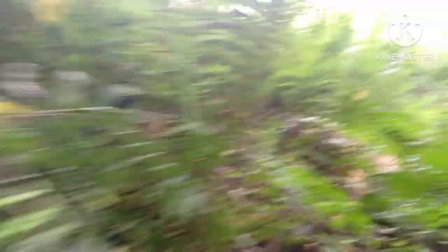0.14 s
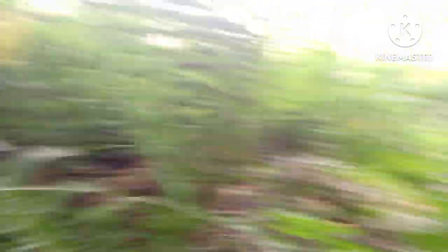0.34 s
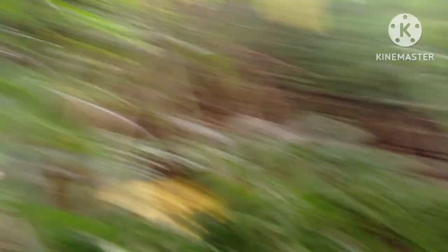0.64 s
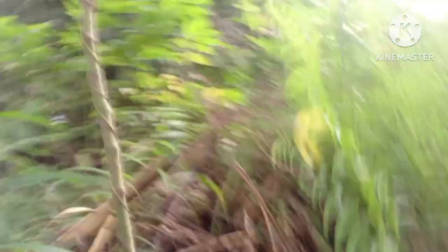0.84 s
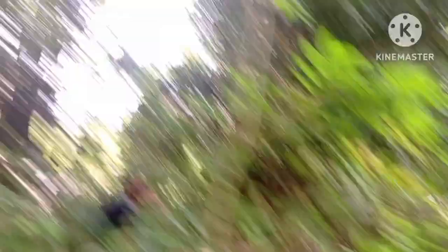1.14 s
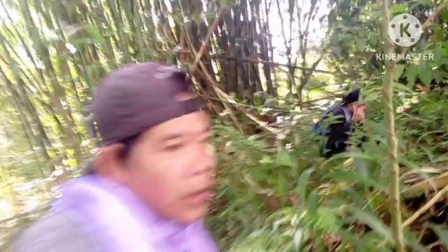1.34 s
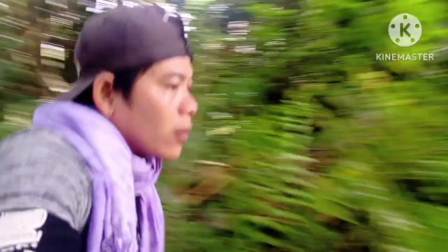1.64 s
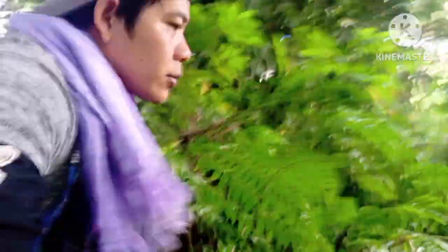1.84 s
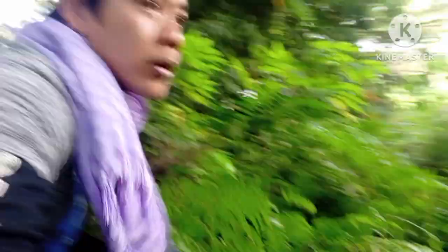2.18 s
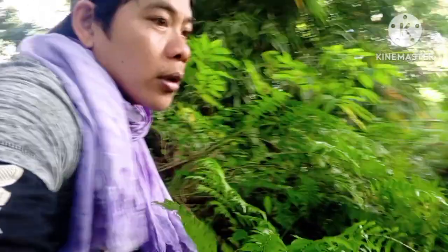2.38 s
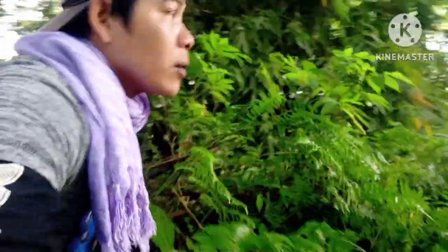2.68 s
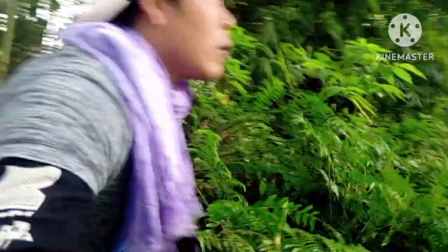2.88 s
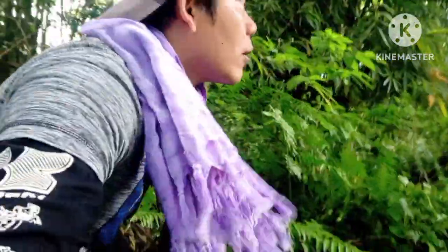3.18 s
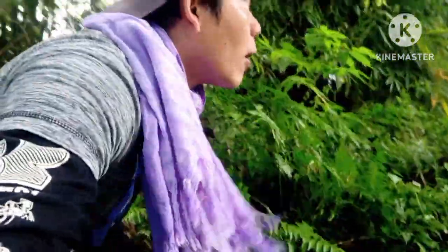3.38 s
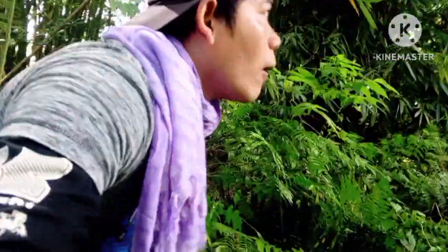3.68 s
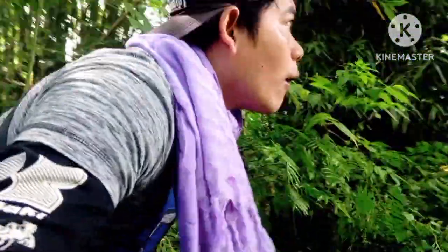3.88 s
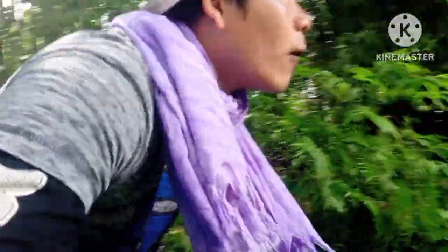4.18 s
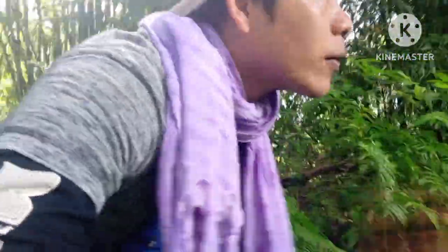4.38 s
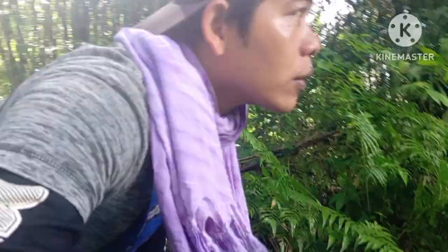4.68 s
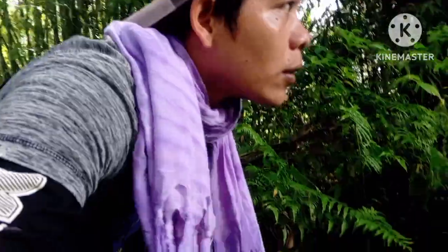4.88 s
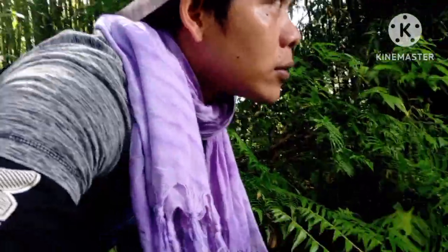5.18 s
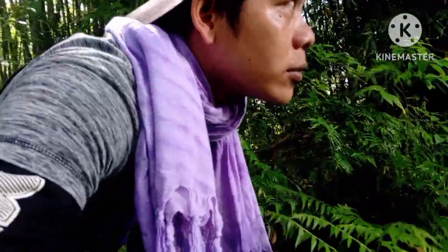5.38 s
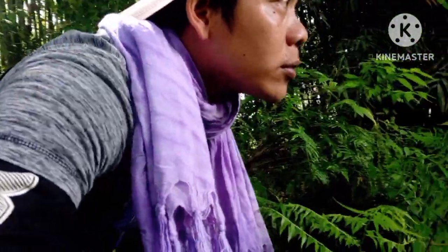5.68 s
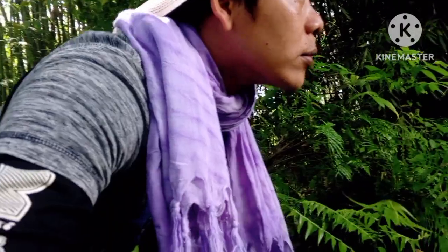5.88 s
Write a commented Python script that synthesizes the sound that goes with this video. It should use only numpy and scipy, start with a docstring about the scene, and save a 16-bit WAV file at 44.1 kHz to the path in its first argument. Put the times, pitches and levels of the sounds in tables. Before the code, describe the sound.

Someone pushes through forest undergrowth close to a handheld microphone. Leaves swish and crunch, and twigs snap sharply in the first two seconds, mixed with low thuds, air puffs and small scrapes of a grip on the holder. The movement eases into lighter rustles and ticks, with one more sharp snap. As the person stands still, faint, distant insects trill over a quiet hiss.

```python
"""Forest undergrowth: someone pushes through with a phone on a stick, then stands still.
Sliding leaves rustle and crunch; twigs snap, ring and splinter. The grip rubs the hollow holder,
knocks travel up the stick, steps thud through it, air puffs on the microphone. Far off, over a quiet
hiss, two kinds of insect sing with wing strokes, dipping under the phone's noise suppression."""
import sys
import numpy as np
from scipy import signal
from scipy.fft import rfft, irfft, next_fast_len
from scipy.io import wavfile
from scipy.ndimage import uniform_filter1d, map_coordinates

SR = 44100
rng = np.random.default_rng(int(sys.argv[2]) if len(sys.argv) > 2 else 0)


def put_to_file(sound):
    """Save the sound as 16-bit audio at rate SR, in the file named by the first command-line argument."""
    columns = np.atleast_2d(sound).T  # one column per channel
    safe = np.clip(columns, -1, 1)
    whole_steps = np.round(safe * 32767)
    wavfile.write(sys.argv[1], SR, whole_steps.astype(np.int16))


N = 265875
T = np.arange(N) / SR

# leaf rustle through the phone microphone, with its treble dip: (frequency [Hz], density [dB])
RUSTLE_AT_MIC = [(2300, -9), (4000, -2.5), (4400, 1.5), (6100, 0.5), (8000, -9.5), (9500, -5.5),
                 (11600, -22), (13700, -17), (15900, -17)]


def foliage():
    """Leaves slide on body and feet: a fine rustle with dry ticks; pressure adds a deeper crunch."""
    # foliage sliding past: (start [s], length [s], rustle [dB], crunch re rustle [dB])
    swishes = [(0, 0.23, -76, 2.5), (0.214, 0.18, -79, 11), (0.58, 0.29, -66.5, -1.5),
               (0.945, 0.17, -60.5, -3), (1.084, 0.11, -67, -6), (1.21, 0.19, -70.5, -29),
               (1.353, 0.68, -63, -8.5), (1.851, .22, -64.5, -3.5), (2.066, 0.25, -58.5, -16),
               (2.279, 0.06, -52.5, -2.5), (2.519, 0.25, -65, -5.5), (2.711, 0.015, -49.5, -5.5),
               (2.724, 0.13, -73.5, 1.5), (3.212, 0.23, -66, -6), (3.481, 0.27, -68.5, -16),
               (3.761, 0.14, -66.5, -5.5), (3.951, 0.16, -68.5, -6), (4.249, 0.19, -64, -7),
               (4.406, 0.11, -67, 3.5), (4.654, 0.078, -68.5, 4.5), (4.778, .26, -70, -12.5)]
    # weight on dry leaves: (start [s], rustle [dB], length [s])
    presses = [(0.14, -50.5, 0.089), (0.372, -61.5, 0.072), (0.879, -47.5, 0.095), (1.742, -53, 0.11),
               (2.496, -61, 0.12), (2.863, -64, 0.16), (2.957, -59.5, 0.081), (3.084, -68.5, 0.088),
               (3.409, -56.5, 0.0237), (3.668, -65, 0.057), (3.885, -60, 0.021), (4.992, -67, 0.03)]
    # crushed-leaf spectrum: (frequency [Hz], density [dB])
    crunch_spectrum = [(300, -19.5), (1000, 4.5), (2000, 8), (3800, -3.5), (5500, -22.5)]
    press_crunch_db = 4
    t = T[::SR // 1000]  # envelopes in 1 ms steps
    moves = [(amp(db) * slide(t - start, length_s), crunch_db)
             for start, length_s, db, crunch_db in swishes]
    moves += [(amp(db) * swell(t - start, length_s, rise=0.073), press_crunch_db)
              for start, db, length_s in presses]
    rustle_env = np.interp(T, t, np.sqrt(sum(env ** 2 for env, _ in moves)))
    crunch_env = np.interp(T, t, np.sqrt(sum((amp(db) * env) ** 2 for env, db in moves)))
    grit = unit(crackle(rate_hz=720, spread_db=7, t60_s=0.012, hiss=0.56))
    ticks = unit(crackle(rate_hz=70, spread_db=4, t60_s=0.0068, hiss=0))
    friction = grit + amp(-14) * ticks
    rustle = unit(filtered(patchy(friction, depth_db=3.5, bins=3, frames=16), colour(RUSTLE_AT_MIC)))
    crunch = unit(filtered(patchy(friction, depth_db=4.5, bins=2, frames=20), colour(crunch_spectrum)))
    return amp(1.5 * wobble(30)) * (rustle_env * rustle + crunch_env * crunch)


def snaps():
    """A break rings for a few cycles at its own pitch; bright splinters spatter after it."""
    # twigs and stiff leaves: (time [s], ring peak [dB], pitch [Hz], splinters re ring [dB])
    breaks = [(0.151, -38, 1800, -16.5), (0.1793, -18.5, 1830, -11.5), (0.354, -46.5, 1940, -13),
              (0.8812, -28, 3830, -10), (0.9018, -15, 1570, -5.5), (0.9171, -18.5, 2360, 0),
              (0.9389, -14.5, 1900, -11.5), (0.958, -28.5, 1360, -21.5), (1.781, -30, 4330, -10),
              (1.785, -22, 2780, -5.5), (1.794, -29, 4500, -6), (2.288, -41.5, 4640, -0.5),
              (2.712, -49.5, 2560, -13.5), (2.7246, -45, 4800, -4.5), (2.872, -49, 2000, -14),
              (2.961, -50, 1930, -3), (3.4118, -33, 2070, -23), (3.692, -40.5, 1560, -13),
              (3.784, -44.5, 3800, -12), (3.889, -39.5, 2400, -11.5), (3.9843, -52, 4400, -10),
              (4.052, -47.5, 3320, -21.5), (4.0923, -16.5, 2664, -18), (4.8618, -45, 3090, -12),
              (5.0021, -45, 2720, -15)]
    body_t60_s, spatter_t60_s = 0.056, 0.011
    out, t = np.zeros(N + SR), T[:SR // 8]
    for start, db, hz, splinter_db in breaks:
        body_noise, splinter_noise = rng.standard_normal((2, len(t)))
        rise_cycles = np.clip(0.4 - splinter_db / 18, 0.4, 2)  # a clean break rings longer
        age = t * hz / rise_cycles
        phase = 2 * np.pi * hz * t
        ring = (np.sin(phase) + 0.15 * np.sin(2 * phase)) * age * np.exp((1 - age ** 2) / 2)
        decay = amp(-60 * t / body_t60_s)
        body = 0.035 * unit(filtered(body_noise, modes([(hz, 0.5 * hz, 0)]))) * decay
        spatter = unit(filtered(splinter_noise,
                                lambda f: amp(splinter_db - 14.5) + colour(RUSTLE_AT_MIC)(f)))
        spatter_env = amp(-60 * t / spatter_t60_s) * (1 - np.exp(-t * hz)) + 0.22 * decay
        splinters = amp(splinter_db) * spatter * spatter_env
        out[round(start * SR):][:len(t)] += amp(db) * (ring + body + splinters)
    return filtered(out[:N], low_cut(1200))  # thin twigs radiate no bass


def knocks():
    """Dull knocks reach the microphone through the stick and die fast."""
    # knocks on the holder: (time [s], level [dB], pitch [Hz])
    hits = [(2.501, -34, 278), (3.89, -48.5, 228), (4.091, -40.5, 234)]
    t60_s = 0.05
    out, t = np.zeros(N), T[:SR // 8]
    for start, db, hz in hits:
        env = amp(db - 60 * t / t60_s) * (1 - np.exp(-t * hz))
        out[round(start * SR):][:len(t)] += env * np.sin(2 * np.pi * hz * t)
    return out


def grip_rubs():
    """The grip slips in short rough strokes: a pitched scrape over the hollow holder's low mode."""
    # strokes: (start [s], scrape [dB], pitch [Hz], low mode re scrape [dB], length [s])
    strokes = [(0.12, -52.5, 802, -31, 0.092), (0.154, -50.5, 775, -1, 0.082),
               (0.18, -34, 694, -10, 0.0054), (0.266, -59, 802, -13, 0.15), (0.386, -46.5, 712, -19, 0.046),
               (0.41, -40.5, 643.6, -9, 0.022), (0.635, -71.5, 482, 2, 0.23),
               (0.742, -61.5, 776, -36, 0.24), (0.907, -44.5, 664, -1.5, 0.065),
               (1.294, -60, 624, -8, 0.012), (1.443, -68, 1276, -30, 0.18), (1.726, -56, 879, -7, 0.16),
               (1.772, -57, 681, -1.5, 0.11), (2.494, -56.5, 587, 8, 0.068),
               (2.556, -61.5, 692, -6.5, 0.14), (2.704, -62.5, 693, -39, 0.17),
               (2.867, -61.5, 777, -10.5, 0.22), (2.954, -63.5, 742, 7, 0.058),
               (3.092, -60.5, 610, -43, 0.043), (3.268, -79, 682, 12, 0.067),
               (3.411, -57.5, 671, -37, 0.015), (3.688, -57.5, 779, -8.5, 0.047),
               (3.891, -57, 721, -22.5, 0.033), (4.45, -64.5, 791, 0, 0.091), (4.485, -57, 816, -1, 0.023),
               (4.666, -63, 730, 5.5, 0.066)]
    mode_hz, mode_width_hz = 360, 170
    out = np.zeros(N)
    slips = crackle(rate_hz=90, spread_db=5, t60_s=0.03, hiss=0.45)
    body = unit(filtered(slips, lambda f: modes([(mode_hz, mode_width_hz, 0)])(f) ** 2))
    rasp = 0.25 + wobble(230) + 1j * wobble(230)  # steady tone plus narrow noise
    for start, db, hz, mode_db, length_s in strokes:
        at = slice(round(start * SR), round((start + 3 * length_s) * SR))
        scrape = np.real(rasp[at] * np.exp(2j * np.pi * hz * T[at]))
        env = amp(db) * swell(T[at] - start, length_s, rise=0.03)
        out[at] += env * (scrape + amp(mode_db) * body[at])
    return filtered(out, low_cut(150))  # too small to radiate bass


def puffs_and_thuds():
    """Air puffs on the microphone, step thuds on the holder: a swell of uneven low cycles and flutter."""
    # air puffs and, at the higher pitches, step thuds: (start [s], peak [dB], pitch [Hz])
    bumps = [(0.002, -68, 70), (0.068, -64, 65.4), (0.16, -53, 222.4), (0.205, -58, 178), (0.335, -62, 164),
             (0.718, -64.5, 93), (0.956, -47, 91.7), (0.657, -48, 63), (0.907, -47, 153), (1.156, -46, 101),
             (1.198, -32.5, 124), (1.244, -34, 83.5), (1.293, -44, 88), (1.52, -53, 83.5),
             (1.624, -49.5, 66.5), (1.667, -59.5, 70), (1.83, -62, 166), (2.997, -58, 48.7),
             (4.911, -53.5, 73), (5.374, -50.5, 76.5)]
    length_s = 0.057
    out = np.zeros(N)
    jitter_rad = 1.5 * wobble(70)
    flutter = 0.14 * unit(wobble(420))
    for start, db, hz in bumps:
        progress = (T - start) / length_s
        at = (progress > 0) & (progress < 1)
        cycles = np.sin(2 * np.pi * hz * (T[at] - start) + jitter_rad[at])
        env = amp(db) * np.sin(np.pi * progress[at] ** 0.8) ** 2
        out[at] += env * (cycles + flutter[at])
    return out


def wing_song(hz, half_width_hz, stroke_hz, depth, jitter_rad):
    """Narrow noise chopped by slightly uneven wing strokes."""
    band = noise_band(hz, half_width_hz)
    strokes = 1 + depth * np.cos(2 * np.pi * stroke_hz * T + jitter_rad * wobble(25))
    return unit(band * strokes)


def insects():
    """A fast trill in bouts and a higher uneven chirp, over a blurred crowd of others."""
    # trill bouts: (start [s], level [dB], pitch [Hz], length [s])
    bouts = [(5.056, -73, 4680, 0.12), (5.509, -65.5, 4650, 0.089), (5.606, -67, 4650, 0.059),
             (5.694, -61, 4750, 0.089), (5.383, -72, 4870, 0.6), (5.855, -61.5, 4700, 0.095)]
    # chorus level at the phone, dipping where its noise suppression closes: (time [s], level [dB])
    chorus_levels = [(.6, -100), (.9, -77), (1.1, -68.5), (2.3, -88.5), (4.6, -94.5), (4.9, -75.5),
                     (6, -72.5)]
    trill = np.zeros(N)
    for start, db, hz, length_s in bouts:
        song = wing_song(hz, half_width_hz=330, stroke_hz=62, depth=0.45, jitter_rad=1.5)
        trill += amp(db) * swell(T - start, length_s, rise=0.3) * song
    chirp = wing_song(hz=6220, half_width_hz=170, stroke_hz=39, depth=0.65, jitter_rad=0.7)
    chirp *= amp(2.5 * wobble(18))
    crowd = unit(patchy(noise_band(hz=5900, half_width_hz=1500), depth_db=4, bins=3, frames=30))
    chorus_db = np.interp(T, *np.transpose(chorus_levels))
    return trill + amp(chorus_db) * (chirp + amp(-4) * crowd)


def air():
    """Quiet hiss of forest and microphone."""
    # noise floor: (frequency [Hz], density [dB])
    spectrum = [(20, -4), (60, -6), (150, -8), (1000, -16), (3300, -15), (7000, -15), (9400, -14.5),
                (12000, -26.5), (16000, -33)]
    level_db = -76 + 0.6 * wobble(15)
    hiss = patchy(rng.standard_normal(N), depth_db=3.5, bins=4, frames=14)
    return amp(level_db) * unit(filtered(hiss, colour(spectrum)))


def amp(db):
    """Decibels to gain."""
    return 10 ** (np.asarray(db) / 20)


def unit(x):
    """x at rms 1."""
    return x / np.sqrt(np.mean(x ** 2) + 1e-20)


def wobble(rate_hz):
    """Smooth random curve, rate_hz knots a second."""
    return map_coordinates(rng.standard_normal(int(N * rate_hz / SR) + 4), [T * rate_hz])


def filtered(x, response):
    """x through a complex frequency response."""
    size = next_fast_len(len(x) + SR // 4)
    return irfft(rfft(x, size) * response(np.fft.rfftfreq(size, 1 / SR)), size)[:len(x)]


def colour(points):
    """Response through (frequency [Hz], gain [dB]) points on a log axis."""
    hz, db = np.transpose(points)
    return lambda f: amp(np.interp(np.log(f + 1), np.log(hz + 1), db, left=-120, right=-120))


def modes(table):
    """Causal response of (centre [Hz], width [Hz], gain [dB]) resonances."""
    return lambda f: sum((-1) ** k * amp(db) * 1j * f * width / (hz * hz - f * f + 1j * f * width)
                         for k, (hz, width, db) in enumerate(table))


def low_cut(hz):
    """Second-order high-pass response."""
    return lambda f: (1j * f / (hz + 1j * f)) ** 2


def noise_band(hz, half_width_hz):
    """Flat-topped band of noise."""
    return filtered(rng.standard_normal(N), lambda f: np.exp(-((f - hz) / half_width_hz) ** 4))


def crackle(rate_hz, spread_db, t60_s, hiss):
    """Short noise bursts of uneven size; hiss is the steady share."""
    onsets = rng.random(N) < rate_hz / SR
    sizes = amp(spread_db * np.minimum(rng.exponential(size=N), 3))
    bursts = signal.lfilter([1], [1, -amp(-60 / (t60_s * SR))], onsets * sizes)
    return rng.standard_normal(N) * (hiss + (1 - hiss) * unit(bursts))


def patchy(x, depth_db, bins, frames):
    """x with random gain in spectrogram patches of bins by frames."""
    spectra = signal.stft(x, nperseg=512)[2]
    field = uniform_filter1d(rng.standard_normal(spectra.shape), bins, 0)
    field = uniform_filter1d(field, frames, 1)
    return signal.istft(spectra * amp(depth_db * unit(field)), nperseg=512)[1][:N]


def swell(t, length_s, rise):
    """Envelope: quick rise, Gaussian fall; rise is a share of the length."""
    age = np.maximum(t / length_s, 0)
    return (1 - np.exp(-age / rise)) * np.exp(-age ** 2)


def slide(t, length_s, rise_s=0.019, stop_s=0.01):
    """Envelope: swells, holds, stops short."""
    return (1 - np.exp(-np.maximum(t, 0) / rise_s)) * np.exp(-np.maximum(t - length_s, 0) / stop_s)


def scene():
    """All sources at one microphone."""
    return (foliage() + snaps() + knocks() + grip_rubs() + puffs_and_thuds() + insects() + air())[None]


def record(dry):
    """The microphone port resonates in the top treble; the phone cuts deep bass and limits the band."""
    port_hz, port_width_hz, port_db = 15100, 800, 13
    bass_hz, top_hz = 50, 15750
    port = modes([(port_hz, port_width_hz, port_db)])
    return filtered(dry[0], lambda f: (1 + port(f)) * low_cut(bass_hz)(f) * (f < top_hz))[None]


dry = scene()
out = record(dry)
put_to_file(out)
```